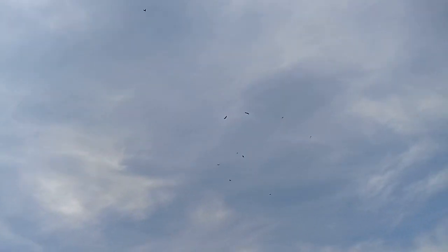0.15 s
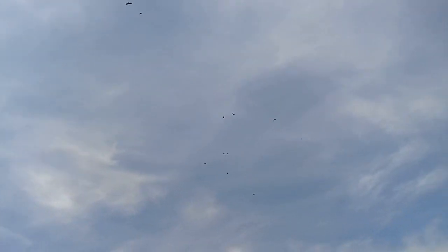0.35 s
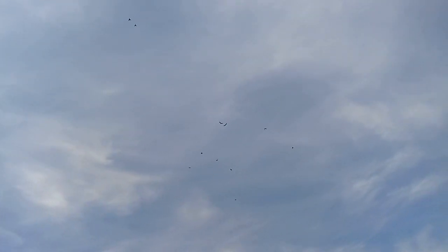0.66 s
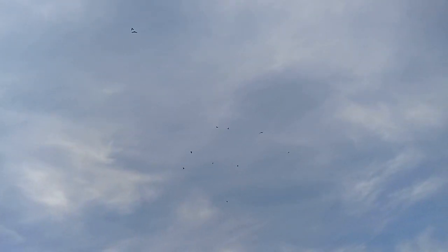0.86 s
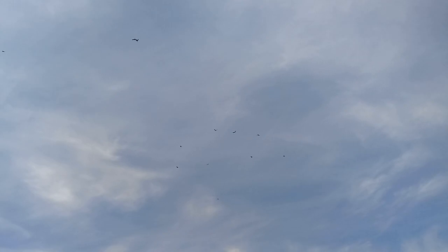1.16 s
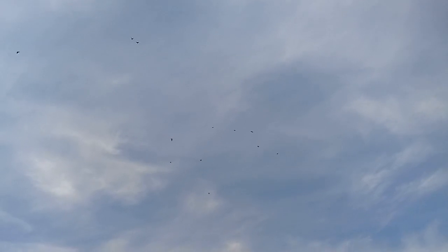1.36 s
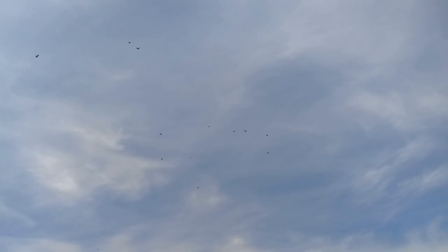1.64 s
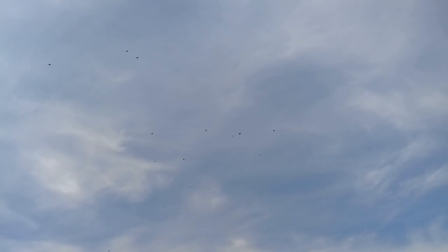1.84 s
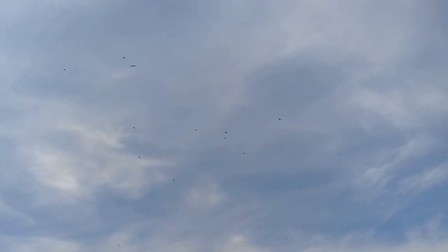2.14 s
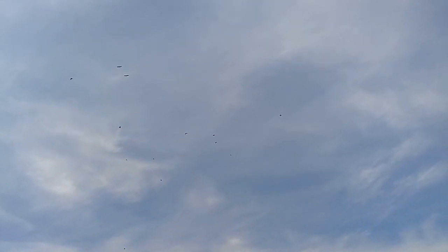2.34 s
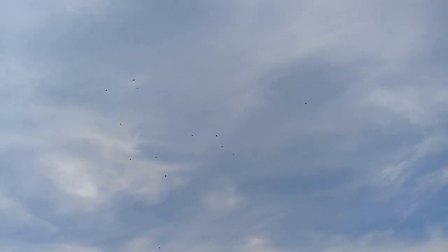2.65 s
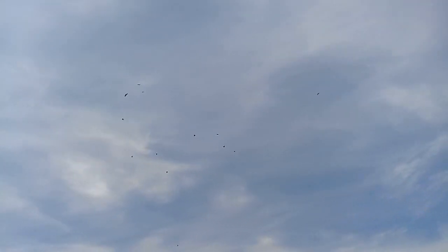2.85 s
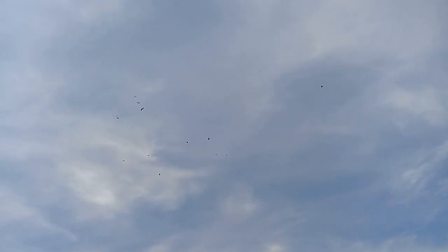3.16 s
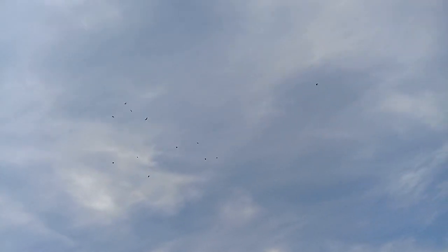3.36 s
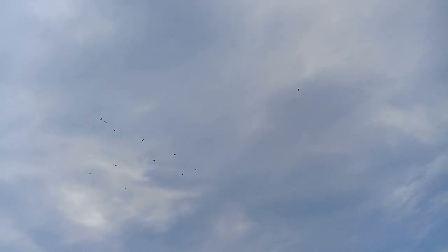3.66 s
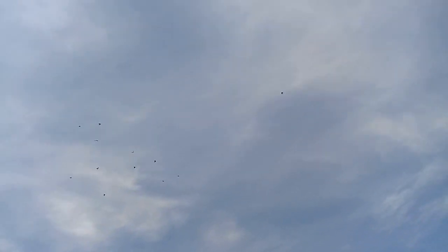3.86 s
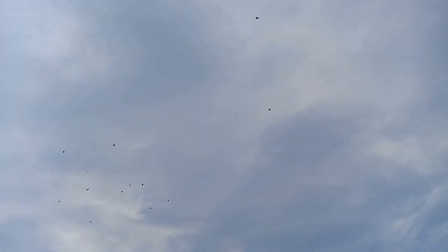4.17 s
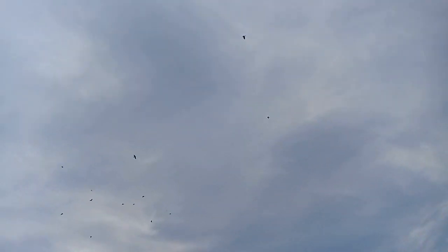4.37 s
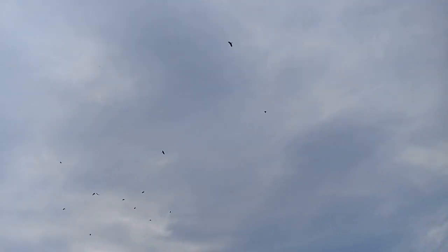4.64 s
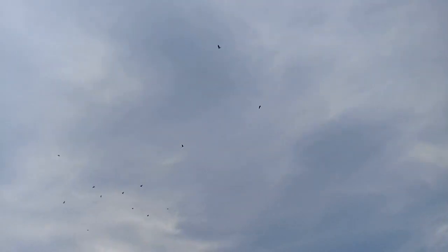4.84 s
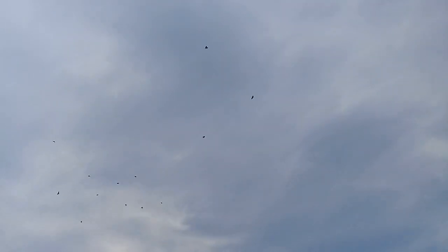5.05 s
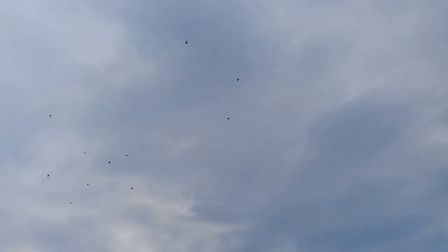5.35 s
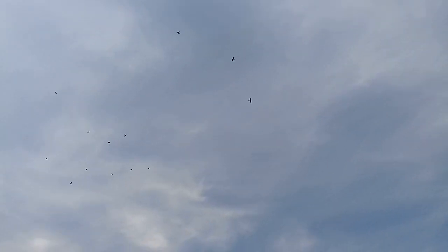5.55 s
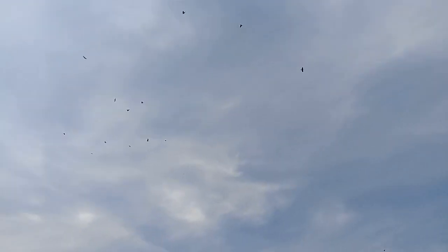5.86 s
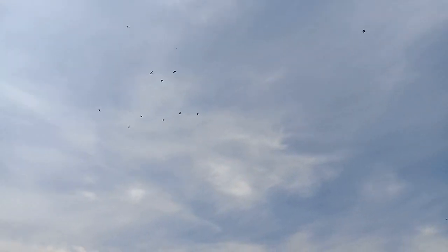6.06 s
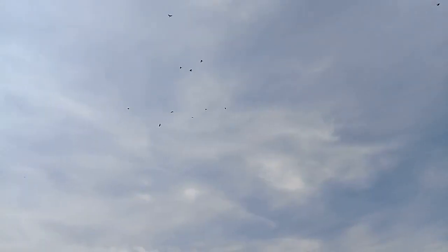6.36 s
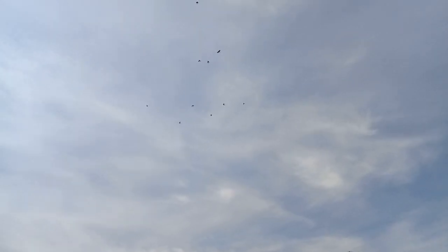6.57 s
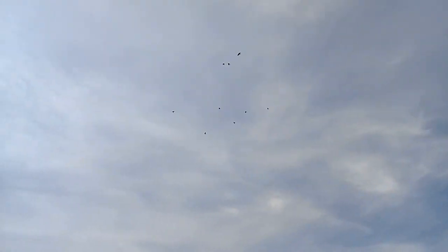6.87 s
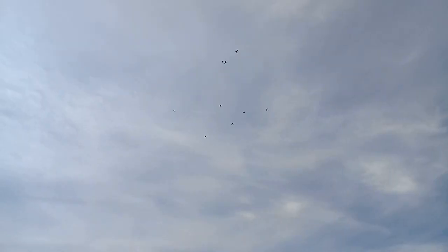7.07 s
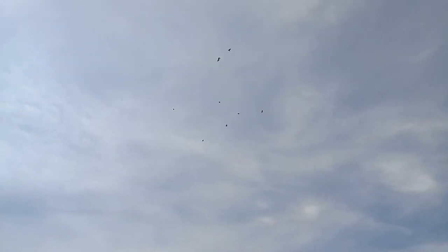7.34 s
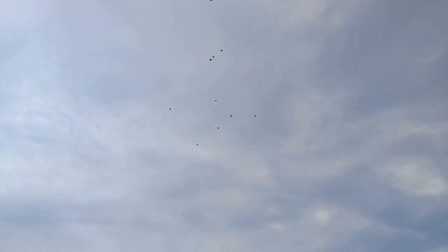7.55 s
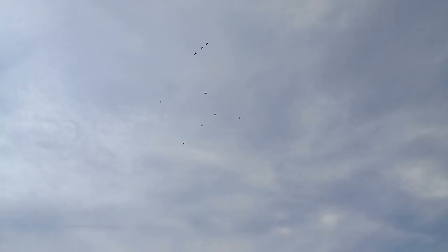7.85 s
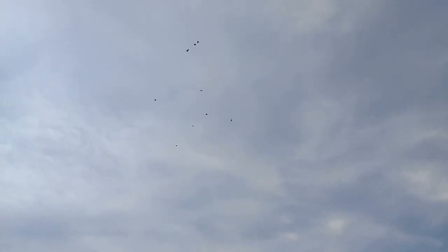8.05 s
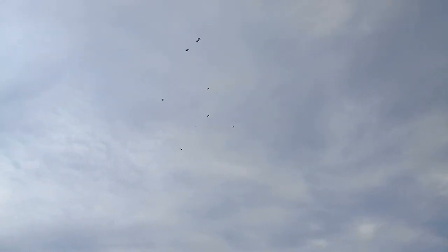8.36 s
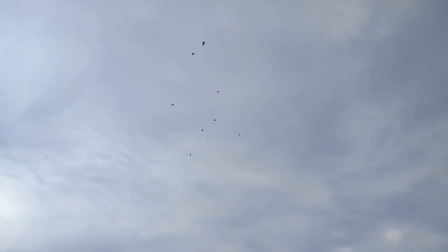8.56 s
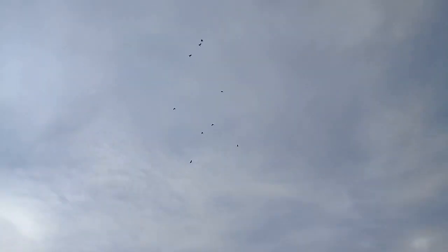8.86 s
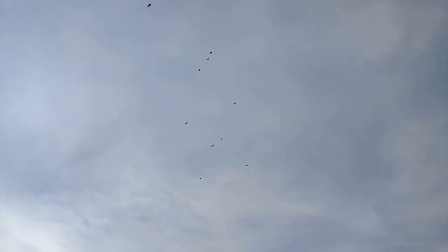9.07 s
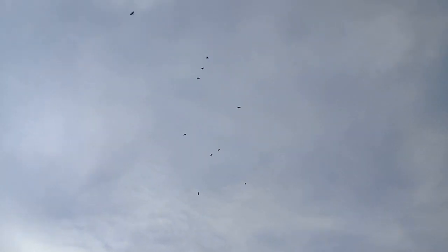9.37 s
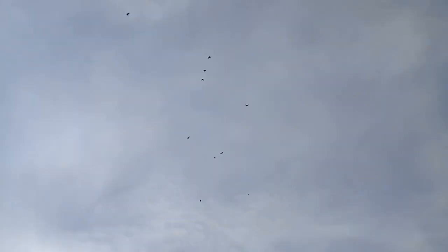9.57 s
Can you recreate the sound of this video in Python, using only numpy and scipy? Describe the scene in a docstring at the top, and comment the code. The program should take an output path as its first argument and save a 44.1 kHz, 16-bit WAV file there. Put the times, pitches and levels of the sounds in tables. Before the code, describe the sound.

Hoarse caws from many crows overlap in the open air, some close and some distant, with brief lulls. Soft wind buffets the hand-held microphone early on, and faint far hoots and a tiny bird trill sit behind. One sharp knock on the camera cuts in about halfway. The crows then grow a little louder, with a few light ticks and a brief rub of a hand, above a quiet outdoor hush.

```python
"""From the start, crows wheel under an open sky, cawing near and far, and the land throws the caws back.
Each caw is a pulse train on an arch of pitch, shaken by a fast rattle and filtered by the throat.
A small bird trills faintly; within a second light gusts buffet the hand-held microphone, and far hoots
follow. At 4.2 s the camera body gives one sharp clack; later it ticks, and near 8.5 s a hand rustles
over it. The crows call on to the end, over a steady outdoor hush."""
import sys
import numpy as np
from scipy import signal
from scipy.fft import rfft, irfft, next_fast_len
from scipy.io import wavfile
from scipy.ndimage import map_coordinates

SR = 44100
rng = np.random.default_rng(int(sys.argv[2]) if len(sys.argv) > 2 else 0)


def bounce(signal):
    """Save signal as a 16-bit WAV file at the path given by the first command-line argument."""
    frames = np.transpose(np.atleast_2d(signal))
    limited = np.clip(frames, -1, 1)
    pcm = np.round(limited * 32767).astype(np.int16)
    wavfile.write(sys.argv[1], SR, pcm)


N = 428211
TIME = np.arange(N) / SR


def caw(length, level_db, top_hz, crest, fall, tilt_db, core_db, hoarse, rasp_db, dull_db,
        hold=0, rattle_depth=.058, rise=.19, rattle_hz=74, harmonics=18):
    """Source-filter model: syrinx pulses and turbulent air, modulated by a rattle, excite the throat."""
    # envelope of a caw, crest at 0.5: (stage [0-1], level [dB])
    envelope = [(0, -33), (.1, -10.5), (.25, -2.53), (.5, -0.5), (.75, -2.38), (.9, -9), (1, -20.5)]
    # resonances of the throat: (frequency [Hz], gain [dB])
    formants = [(300, -51), (500, -40), (750, -20.5), (980, -14), (1150, -14), (1400, -2.7), (1650, 1),
                (1900, 2), (2350, -7.5), (2600, -22), (2850, -38), (3600, -82)]
    # upper resonances, heard as rasp: (frequency [Hz], gain [dB])
    rasp_formants = [(2500, -30), (3200, -12), (3850, 3), (4300, -7), (5300, -8), (5950, -2.5), (6600, -12),
                     (7300, -28), (10000, -44)]
    sample = np.arange(int(np.clip(length, .05, .45) * SR))
    size = len(sample)
    drift, jitter, flutter = (wander(SR // 2, hz)[:size] for hz in (45, 260, 45))
    hiss = rng.standard_normal(SR // 2)[:size]
    phases = np.pi * rng.uniform(-.95, 1, (harmonics, 1))
    bird, height = rng.uniform(-1.023, 1, 2)
    stage = np.interp(sample / size, [0, np.clip(crest, .1, .9), 1], [0, .5, 1])
    from_crest = 2 * stage - 1
    rising = from_crest < 0
    arch = 1 - np.where(rising, rise, fall) * abs(from_crest) ** np.where(rising, 2.1, 2.7)
    # a second, slow oscillator swings pitch and loudness together; each bird has its own rate
    rattle_rate = rattle_hz * (1 + .0702 * bird) * arch * (1 + .0886 * drift)
    rattle = 2 * np.pi * np.cumsum(rattle_rate) / SR
    throb = 1 + .2 * np.cos(rattle + .13)
    waver = 1 + rattle_depth * (1 + hoarse) * np.sin(rattle) + (.01 + .06 * hoarse) * jitter
    phase = 2 * np.pi * np.cumsum(top_hz * arch * waver) / SR
    pulses = unit_rms(np.cos(np.arange(1, harmonics + 1)[:, None] * phase + phases).sum(0))
    puffs = hiss * (1 + np.cos(phase))
    # tilt_db and dull_db are slopes per octave; core_db weights the nasal band
    throat = [(f, db + tilt_db * np.log2(f / 1700) + core_db * np.exp(-((f - 1850) / 220) ** 2))
              for f, db in formants]
    upper = [(f, db - dull_db * np.log2(f / 4000)) for f, db in rasp_formants]
    # the bill opens with the pitch and shuts late: the throat follows a little, the rasp more
    voice = gliding_filter(throb * (pulses + (.04 + .7 * hoarse) * puffs), throat, arch ** .15)
    rasp = gliding_filter(throb * (pulses + .5 * puffs), upper, arch ** np.where(rising, .8, .25))
    call = voice + gain_of(rasp_db - 2.5 * from_crest) * rasp
    # the ground reflection lags by the bird's height and comb-filters the harmonics
    lag = round((.006 + .002003 * height) * SR)
    call = unit_rms(call + .56 * np.interp(sample - lag, sample, call, left=0))
    swell_db = np.interp(stage, *np.transpose(envelope)) * (1 - hold * (1 - from_crest ** 8))
    return gain_of(level_db + swell_db + 1.34 * flutter) * call * signal.windows.tukey(size, .06)


def crows(near_db=-39.5, clear_hz=487, slack_hz=13):
    """Aperiodicity makes hoarseness: low or faint caws carry more noise and jitter than the rest."""
    # caws: (start [s], length [s], level [dB], top pitch [Hz], crest position [0-1],
    # brightness [dB/octave], rasp [dB])
    caws = [(-0.005, .27, -50.5, 448, .42, 4, -40), (.186, .29, -46.8, 455, .5, 7, -35),
            (.333, .26, -47, 459, .38, -3, -33), (.535, .26, -47.3, 493, .5, 6, -33),
            (.745, .31, -39.6, 480, .42, -2.5, -22), (.945, .26, -43, 465, .36, 1, -29),
            (1.341, .305, -40.8, 462, .37, 2, -22.5), (1.72, .19, -65.5, 420, .55, 12, -40),
            (1.854, .34, -60, 535, .5, 8, -45), (2.071, .25, -45.5, 472, .37, -3, -35.5),
            (2.648, .24, -44.5, 458, .52, -2, -36), (2.726, .26, -49.5, 490, .56, 2, -42),
            (3.032, .29, -45, 492, .42, -1, -35), (3.261, .28, -39, 482, .44, 0, -23.5),
            (3.545, .3, -46, 491, .56, -5, -31), (3.661, .25, -45, 507, .46, -3, -27.5),
            (3.837, .29, -44, 443, .47, 1.5, -35), (4.16, .29, -44.3, 506, .45, -4, -29),
            (4.44, .33, -44.5, 452, .48, 6, -42), (5, .23, -63.5, 460, .48, 30, -40),
            (5.42, .24, -42.8, 496, .48, 2, -38), (5.923, .285, -39, 498, .38, -1, -27.5),
            (6.173, .24, -46, 450, .42, 5, -30), (6.545, .268, -37.5, 490, .5, 3, -26),
            (7.113, .277, -38.5, 485, .48, 4.5, -27), (7.408, .29, -41, 496, .48, -1, -27),
            (7.544, .25, -42, 497, .43, 2.5, -28), (7.835, .31, -36.8, 489, .47, 0, -25.5),
            (7.935, .335, -39.3, 478, .44, 0, -26.5), (8.405, .295, -36.7, 477, .5, -1, -24),
            (8.538, .295, -38.6, 477, .32, -2, -23), (8.975, .26, -44.8, 474, .52, -2.5, -23),
            (9.26, .14, -54, 470, .4, 6, -40), (9.47, .26, -41.3, 457, .44, 1, -28)]
    out = np.zeros(N)
    for start, length, db, hz, crest, bright, rasp_db in caws:
        faint_db = np.clip(near_db - db, 0, 10)
        slack = np.clip((clear_hz - hz) / slack_hz, 0, 1)  # the voice goes slack at low pitch
        hold = max(.3 - .05 * faint_db, 0) * (1 - slack)  # a clear, near caw sustains its level
        call = caw(length, db, hz, crest, fall=.22, tilt_db=bright, core_db=-1.7 + .7 * bright,
                   hoarse=.04 + .007 * faint_db + .17 * slack, rasp_db=rasp_db,
                   dull_db=1 + 1.2 * faint_db, hold=hold, rattle_depth=.048 + .012 * slack)
        add(out, start, call)
    return out


def far_flock(count=28):
    """Superposition: hoarse, dull caws from the rest of the flock add up far off, in bouts."""
    # bouts of calling: (start [s], length [s], level [dB])
    bouts = [(0, 1.9, -68), (3.4, .55, -62), (4.4, .35, -63), (5.75, 1.1, -70), (7.7, 2, -60)]
    out = np.zeros(N)
    for k, (late, pitch, tilt) in enumerate(rng.uniform(-1, 1, (count, 3))):
        call = caw(length=.26, level_db=0, top_hz=480 + 45 * pitch, crest=.45, fall=.14,
                   tilt_db=4 + 4 * tilt, core_db=1.6, hoarse=.22, rasp_db=-33, dull_db=8)
        add(out, (k + late / 2 - .5) * N / SR / count, call)
    return unit_rms(out) * swells(bouts, rise_s=.2, fade_s=.1)


def land(x, near_db=-15, tail_db=-24, echo_s=.16, reflections_per_s=2000):
    """Convolution with reflections: scatter from close by, a dull echo from trees and a thin tail."""
    # reverberation of the land: (frequency [Hz], time to fall 60 dB [s])
    decay_times = [(300, .6), (1000, 0.65), (1900, 0.94), (3000, 0.21), (7000, 0.11)]
    t = np.arange(SR) / SR
    near, tail, echo = rng.choice([-1., 1.], (3, SR)) * (rng.random((3, SR)) < reflections_per_s / SR)
    hz, when, spectra = signal.stft(tail, SR, nperseg=256)
    decay = gain_of(-60 * when / value_at(decay_times, hz)[:, None])
    tail = signal.istft(spectra * decay, SR, nperseg=256)[1][:SR]
    near = near * np.exp(-t / .014)
    echo = echo * np.exp(-((t - echo_s) / .07) ** 2)
    near, tail, echo = (part / np.linalg.norm(part) for part in (near, tail, echo))
    echo = signal.lfilter(*signal.butter(2, 2800, fs=SR), echo)
    response = gain_of(near_db) * near + gain_of(tail_db) * tail + gain_of(-30) * echo
    return x + signal.fftconvolve(x, response)[:N]


def clacks(size=4096):
    """Impact excitation: each blow on the camera gives a brief snap and rings its damped modes."""
    # blows: (time [s], snap peak [dB], ring peak [dB])
    blows = [(4.2266, -50, -29), (4.2313, -23, -26.5), (4.24, -22, -44), (6.217, -44, -75),
             (7.271, -42, -54), (8.469, -40, -41)]
    # modes of the body: (frequency [Hz], level [dB], time to fall 60 dB [s])
    modes = [(190, 3.5, 0.069), (270, 6, 0.023), (480, -12.5, 0.052), (686, 2, 0.032), (1620, 8.5, 0.027)]
    # spectrum of the snap: (frequency [Hz], level [dB])
    snap_spectrum = [(100, 1.5), (600, 8.5), (1800, 9.5), (3000, -5), (4500, -4.5), (6300, 0.5),
                     (7400, -31), (10000, -37), (16000, -36)]
    t = np.arange(size) / SR
    log_gain = np.log(gain_of(value_at(snap_spectrum, abs(np.fft.fftfreq(size, 1 / SR)))))
    snap = np.fft.ifft(np.exp(np.conj(signal.hilbert(log_gain)))).real  # minimum-phase impulse
    ring = sum(gain_of(db - 60 * t / t60) * np.sin(2 * np.pi * hz * t) for hz, db, t60 in modes)
    snap, ring = snap / abs(snap).max(), ring / abs(ring).max()
    out = np.zeros(N)
    for start, snap_db, ring_db in blows:
        add(out, start, gain_of(snap_db) * snap + gain_of(ring_db) * ring)
    return out


def wind(lump_db=2, breeze_db=-63, calm_db=-64.5, calm_s=6.2):
    """Turbulent pressure buffets the microphone; as the wind drops, its deepest part goes."""
    # gusts over the breeze: (start [s], length [s], level [dB])
    gusts = [(.7, .5, -56.5), (1.24, .16, -49.5), (1.5, .22, -55), (1.9, .4, -63), (4.92, 1.1, -57.5),
             (8.5, 1.1, -66)]
    # spectrum of the buffeting: (frequency [Hz], level [dB])
    buffet_spectrum = [(15, -13), (30, -9.5), (50, 3), (80, 0), (120, -3.5), (180, -21), (300, -35.5),
                       (600, -38), (1500, -82)]
    lumps = gain_of(lump_db * wander(next_fast_len(N), 12.4)[:N])
    buffet = coloured(rng.standard_normal(N), buffet_spectrum)
    rumble = unit_rms(signal.sosfilt(signal.butter(2, 60, "high", fs=SR, output="sos"), buffet))
    calm = np.clip((TIME - calm_s) / .24 + .5, 0, 1)
    breeze = gain_of(breeze_db + (calm_db - breeze_db) * calm)
    strength = np.hypot(breeze, swells(gusts, rise_s=.05, fade_s=.09))
    return unit_rms(((1 - calm) * buffet + calm * rumble) * lumps) * strength


def thumps(swing_hz=78, width_s=.011):
    """Low pressure pulses at the microphone: puffs of wind and, near 8.5 s, a knock on the camera."""
    # low thumps: (time [s], envelope peak [dB])
    pulses = [(.81, -49), (1.237, -47), (1.587, -42), (3.228, -44), (4.57, -51), (4.67, -49), (4.893, -43),
              (7.205, -52), (8.475, -47)]
    out = np.zeros(N)
    t = np.arange(-SR // 10, SR // 10) / SR
    for (when, db), (phase, detune) in zip(pulses, rng.uniform(-1, 1, (len(pulses), 2))):
        swing = np.cos(2 * np.pi * swing_hz * (1 + .15 * detune) * t + np.pi * phase)
        add(out, when + t[0], gain_of(db) * np.exp(-(t / width_s) ** 2) * swing)
    return out


def rub(grain_db=1.5, stereo_width=.12):
    """Sliding friction: skin slips over the camera in fine grains, a little different at each port."""
    # strokes of the hand: (start [s], length [s], level [dB])
    strokes = [(6.92, .02, -73), (8.43, .76, -68), (8.67, .31, -60)]
    # spectrum of the friction: (frequency [Hz], level [dB])
    friction_spectrum = [(80, 5), (170, 13.5), (700, 2.5), (2800, -7), (4200, 3), (5800, 5.5), (7300, -5.5),
                         (8600, 0.5), (10000, -2), (12000, 2.5), (15500, -6)]
    grains = rng.standard_normal((2, N)) * gain_of(grain_db * wander(next_fast_len(N), 110)[:N])
    mid = coloured(grains[0], friction_spectrum)
    side = stereo_width * coloured(np.gradient(grains[1]), friction_spectrum)
    return np.array([mid + side, mid - side]) * swells(strokes, rise_s=.025, fade_s=.03)


def far_calls():
    """Spectral broadening: of each distant hoot or cry, one randomly modulated line is left."""
    # calls: (start [s], length [s], level [dB], pitch [Hz], glide [share of pitch], line width [Hz])
    calls = [(1.217, 0.22, -73, 1086, .1, 68), (2.09, .16, -67, 800, -0.012, 45),
             (2.24, 0.18, -65.5, 970, .08, 17), (2.366, 0.31, -68.5, 975, -0.003, 29),
             (2.8, 0.13, -61, 810, -0.15, 110), (3.326, 0.51, -66.5, 599, .2, 120),
             (3.548, 0.25, -66.5, 713, -.15, 210), (3.667, .15, -61, 353, 0, 13),
             (4.417, .14, -69, 352, 0, 8), (4.993, 0.073, -71, 345, -0.042, 8),
             (4.99, 0.3, -63, 825, -.07, 57), (5.043, 0.21, -66, 668, -0.13, 220),
             (5.22, 0.4, -72.5, 836, 0, 59)]
    out = np.zeros(N)
    for start, length, db, hz, glide, width_hz in calls:
        from_middle = np.linspace(-.5, .5, int(length * SR))
        blur = 1 + wander(SR, width_hz) + 1j * wander(SR, width_hz) / 2
        carrier = np.exp(2j * np.pi * np.cumsum(hz * (1 + glide * from_middle)) / SR)
        tone = unit_rms((blur[:len(carrier)] * carrier).real)
        add(out, start, gain_of(db) * tone * np.cos(np.pi * from_middle))
    return out


def trill(notes_per_s=62, sweep_hz=600, flicker_db=2, blur=.65):
    """Sawtooth frequency modulation: a small bird's fast run of falling notes, blurred by distance."""
    # phrases: (start [s], length [s], level [dB], centre frequency [Hz])
    phrases = [(.2, .55, -84, 5000), (2.25, .6, -85, 5050), (4.4, 1.4, -88.5, 5050), (6.3, .3, -84, 4700),
               (6.8, .9, -79.5, 4850), (9.1, .6, -74, 4640)]
    size = next_fast_len(N)
    note_stage = np.cumsum(notes_per_s * (1 + .02 * wander(size, 3.8)[:N])) / SR % 1
    contour = [(at, hz) for start, length, _, hz in phrases for at in (start, start + length)]
    centre_hz = np.interp(TIME, *np.transpose(contour))
    carrier = np.exp(2j * np.pi * np.cumsum(centre_hz + sweep_hz * (.5 - note_stage)) / SR)
    scatter = (wander(size, 240) + 1j * wander(size, 300))[:N]
    song = (carrier * (np.sin(np.pi * note_stage) ** 2 + blur * scatter)).real
    flicker = gain_of(flicker_db * wander(size, 10)[:N])
    return unit_rms(song * flicker) * swells(phrases, rise_s=.15, fade_s=.12)


def hush(level_db=-68):
    """Partly coherent noise: a steady outdoor hush in which only the treble differs between the sides."""
    # spectrum of the outdoor hush, with a wash of distant crows near 1.9 kHz:
    # (frequency [Hz], relative density [dB])
    hush_spectrum = [(100, 0.1), (250, -6), (400, -7.5), (800, -8), (1150, -14), (1400, -13), (1900, -4.3),
                     (2300, -9), (2900, -21), (4800, -21), (6500, -26), (10000, -26), (12000, -24),
                     (15700, -26)]
    # likeness of left and right: (frequency [Hz], correlation [0-1])
    correlation = [(100, 1), (2500, 1), (4000, 0.91), (8000, 0.25), (15000, 0.41)]
    size = next_fast_len(N)
    hz = np.fft.rfftfreq(size, 1 / SR)
    mid, side = rfft(rng.standard_normal((2, size))) * gain_of(value_at(hush_spectrum, hz))
    same = value_at(correlation, hz)
    mid, side = mid * np.sqrt(1 + same), side * np.sqrt(1 - same)
    return gain_of(level_db) * unit_rms(irfft([mid + side, mid - side], size)[:, :N])


def gain_of(db):
    """Amplitude ratio of a level in decibels."""
    return 10 ** (np.asarray(db) / 20)


def unit_rms(x):
    """Normalisation to a mean power of one."""
    return x / np.sqrt(np.mean(x ** 2) + 1e-20)


def value_at(points, hz):
    """Interpolation of a table on a log-frequency axis."""
    f, value = np.transpose(points)
    return np.interp(np.log(hz + 1), np.log(f + 1), value)


def add(mix, start_s, sound):
    """Superposition of a sound on the mix, from start_s on."""
    at = round(start_s * SR)
    sound = sound[max(-at, 0):]
    part = mix[max(at, 0):][:len(sound)]
    part += sound[:len(part)]


def coloured(x, points):
    """Zero-phase filtering by a spectrum table, at unit rms."""
    size = next_fast_len(len(x))
    response = gain_of(value_at(points, np.fft.rfftfreq(size, 1 / SR)))
    return unit_rms(irfft(rfft(x, size) * response, size)[:len(x)])


def gliding_filter(x, points, scale):
    """Time warping around a fixed filter multiplies its frequencies by the curve scale."""
    warped_time = np.cumsum(scale)
    positions = np.interp(np.arange(warped_time[-1]), warped_time, np.arange(len(x)))
    filtered = coloured(map_coordinates(x, [positions]), points)
    return unit_rms(map_coordinates(filtered, [warped_time]))


def wander(size, hz):
    """Low-pass noise: smooth random motion with its cutoff at hz, at unit rms."""
    spectrum = rfft(rng.standard_normal(size))
    return unit_rms(irfft(spectrum / (1 + (np.fft.rfftfreq(size, 1 / SR) / hz) ** 4), size))


def swells(rows, rise_s, fade_s):
    """Power summation: the joint gain of events that swell up to their start, hold and die away."""
    power = 0
    for start, length, db, *_ in rows:
        early = np.maximum(start - TIME, 0) / rise_s
        late = np.maximum(TIME - start - length, 0) / fade_s
        power = power + (gain_of(db) * np.exp(-early ** 2 - late)) ** 2
    return np.sqrt(power)


def scene():
    """Superposition of the birds, their reflections, the noises at the microphone and the hush."""
    birds = land(crows() + far_flock() + far_calls() + trill())
    return birds + wind() + thumps() + rub() + clacks() + hush()


def record(dry):
    """Band limiting: a steep low-pass filter removes the highest treble."""
    cutoff_hz = 15750
    low_pass = signal.firwin(511, cutoff_hz, window=("kaiser", 9), fs=SR)
    return signal.oaconvolve(dry, low_pass[None], "same")


dry = scene()
out = record(dry)
bounce(out)
```